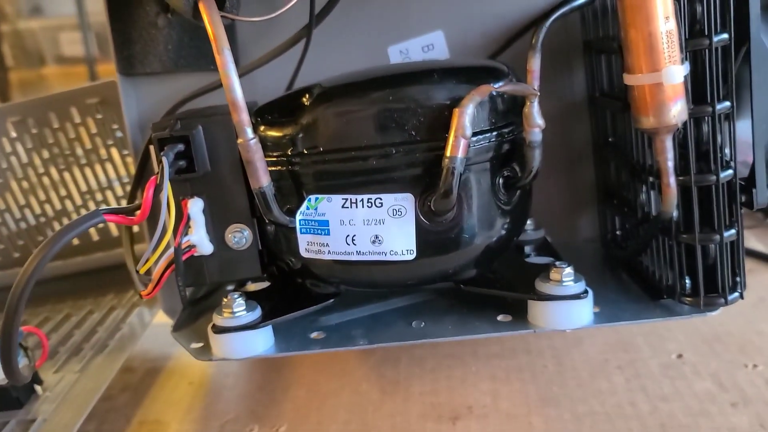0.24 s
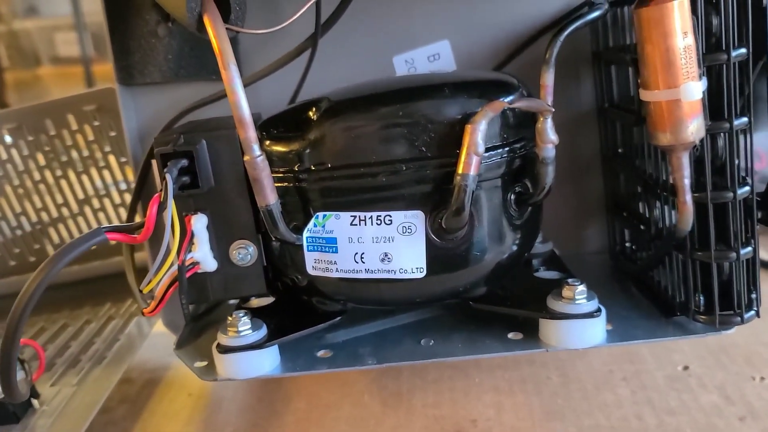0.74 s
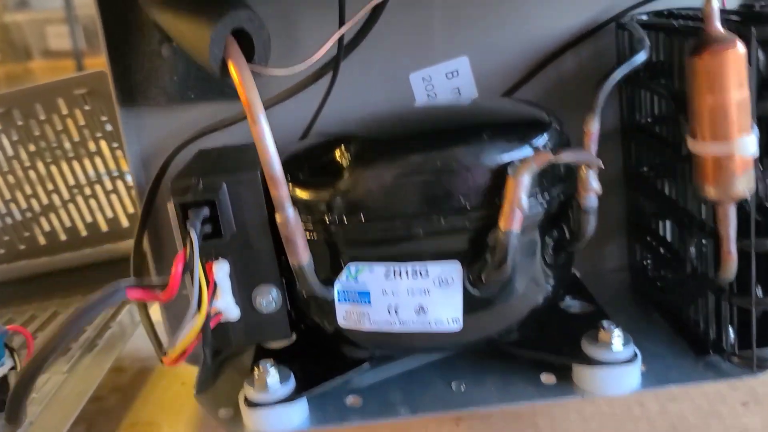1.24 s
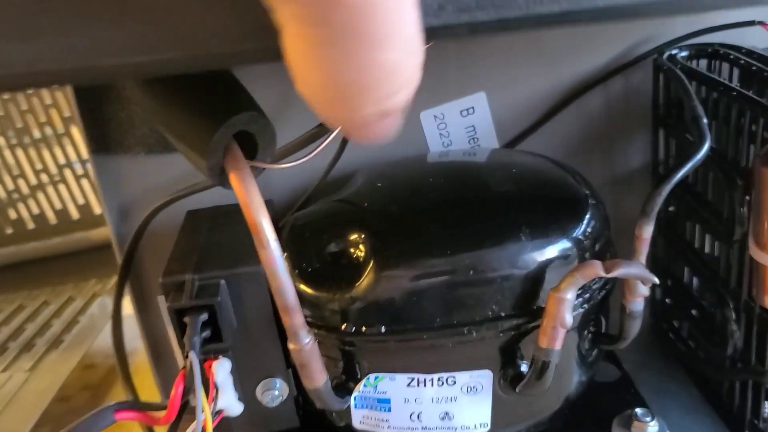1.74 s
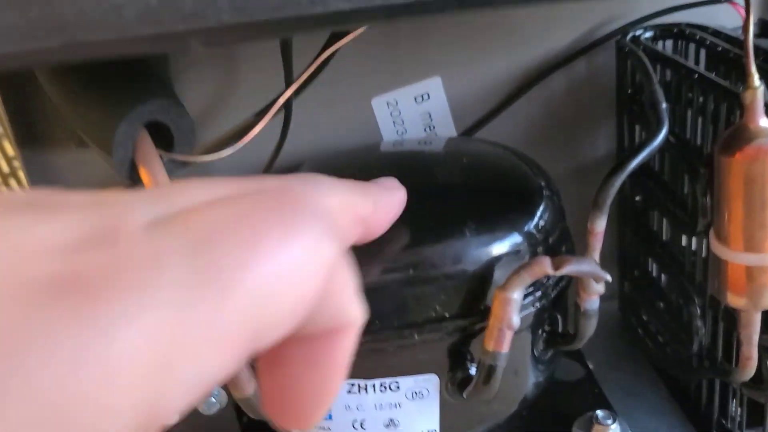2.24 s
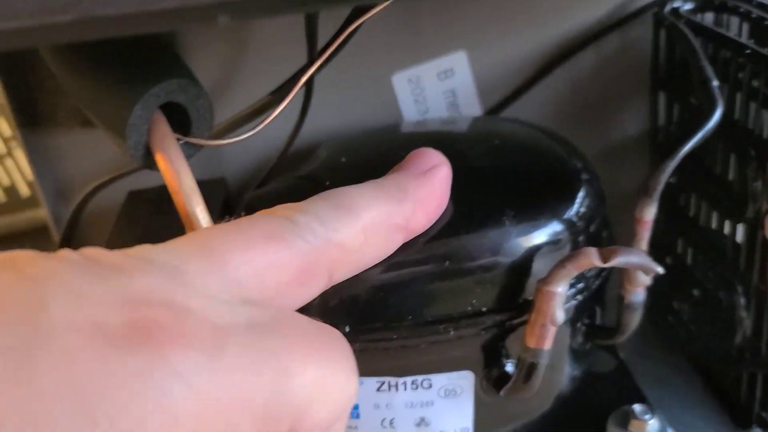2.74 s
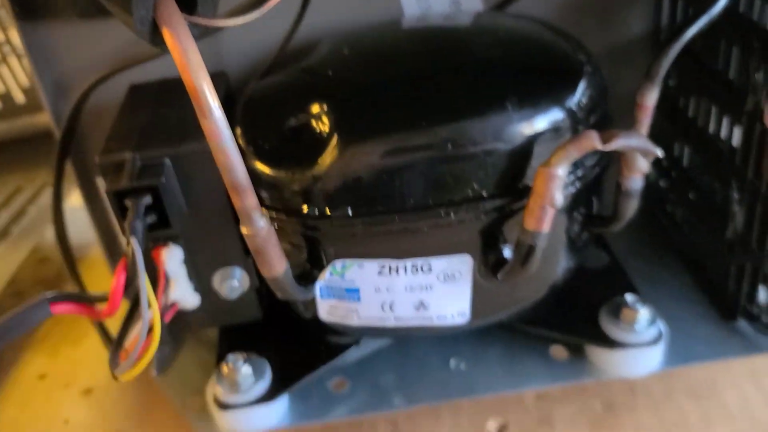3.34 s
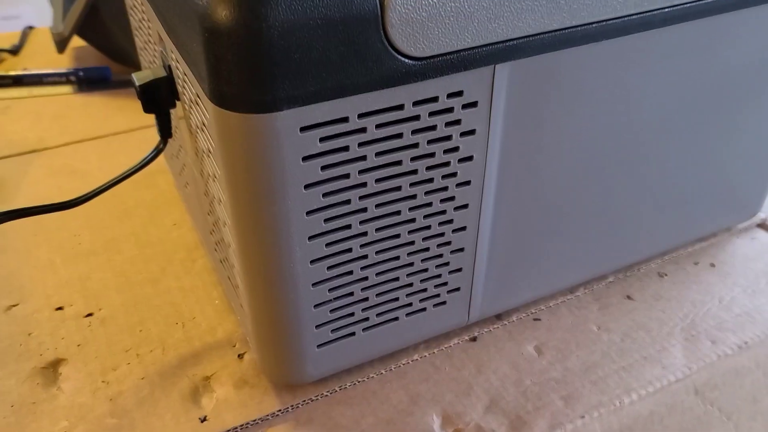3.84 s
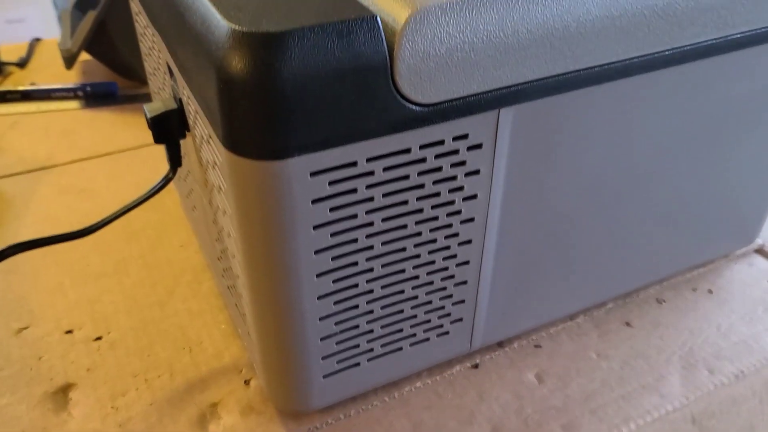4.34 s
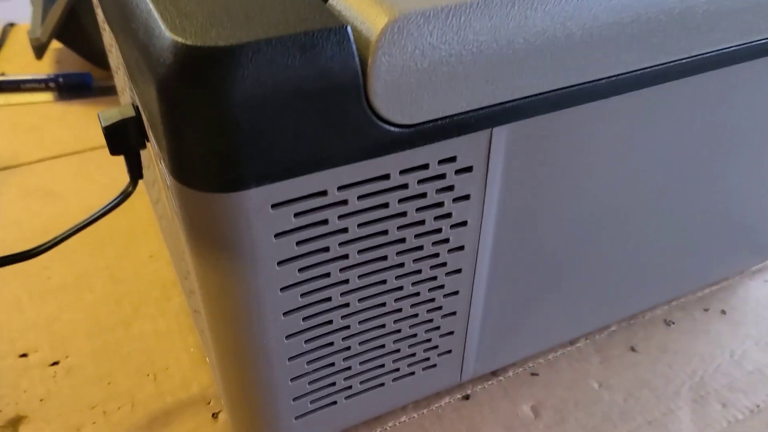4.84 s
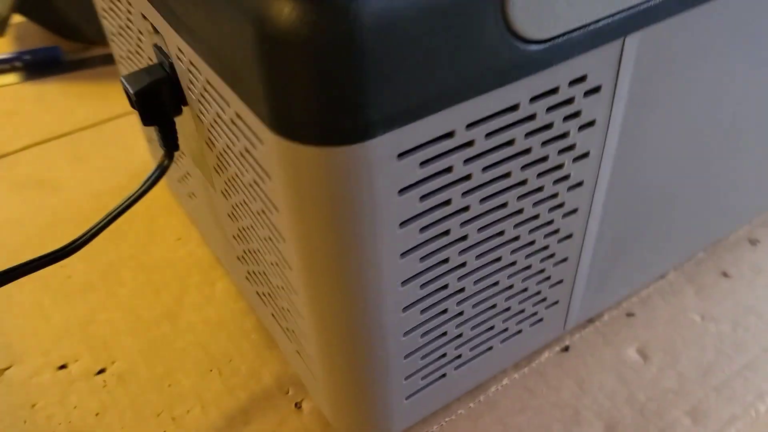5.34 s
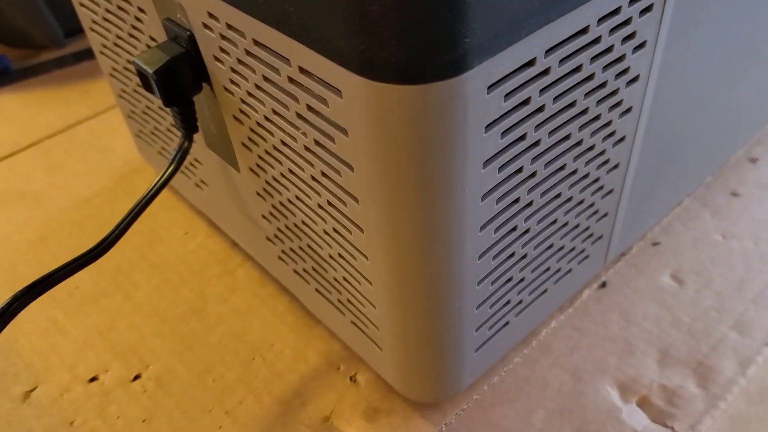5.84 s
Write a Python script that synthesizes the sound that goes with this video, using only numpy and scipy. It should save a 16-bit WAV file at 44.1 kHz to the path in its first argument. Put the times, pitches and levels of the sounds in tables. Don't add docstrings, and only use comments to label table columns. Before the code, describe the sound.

A small sealed fridge compressor hums and rattles loosely, is knocked and pressed steadier, then after a tiny silence hums on inside its closed cabinet.

```python
import sys
import numpy as np
from scipy import signal
from scipy.fft import rfft, irfft, next_fast_len
from scipy.io import wavfile

SR = 44100
rng = np.random.default_rng(int(sys.argv[2]) if len(sys.argv) > 2 else 0)


def makeup_ratio(level_db):
    decades = np.asarray(level_db, float) / 20
    return 10 ** decades


def materialize(psi):
    bounded = np.clip(np.atleast_2d(psi).T, -1, 1)
    quanta = np.round(bounded * 32767).astype(np.int16)
    wavfile.write(sys.argv[1], SR, quanta)


N = 268833

# time in seconds, speed in turns per second.
SPEED_TURNS_PER_S = [(0, 33.602), (.6, 33.542), (1.2, 33.499), (1.8, 33.396), (2.4, 33.498), (3, 33.457),
                     (3.72, 33.465), (3.79, 33.634), (4.4, 33.546), (5, 33.507), (5.6, 33.584),
                     (6.1, 33.583)]
SILENCE_S = (3.7165, 3.792, 6.096)
# time in seconds, state (0 loose, 1 rocking, 2 pressed, 3 closed cabinet).
HOLD = [
    (0, 0),
    (1.47, 0),
    (1.6, 1),
    (1.88, 1),
    (1.98, 2),
    (3.75, 2),
    (3.76, 3),
    (6.1, 3),
]
# order, level in dB loose, rocking, pressed, closed.
ORDER_DB = [(1, -46, -48, -67, -60.5), (2, -59, -44, -33.5, -41), (3, -54, -31, -39.5, -38.),
            (4, -72, -48, -55, -56), (5, -52, -40, -30, -35.5), (6, -58, -39, -50, -37),
            (7, -83.5, -41, -74, -46.5), (8, -82, -41, -43, -52.5), (9, -84, -53, -61.5, -64),
            (10, -98, -60, -55.5, -63.5), (11, -58.5, -48, -58.5, -60.5), (12, -57, -48.5, -86, -71.5),
            (13, -60, -58, -61.5, -52), (14, -91, -80, -68, -61), (15, -80, -78, -61.5, -75),
            (16, -85, -70, -66, -76), (17, -85, -77, -71.5, -71), (19, -69, -69, -71, -67.5),
            (21, -124, -62.5, -77.5, -71), (22, -130, -115, -100, -68), (23, -57.5, -56.5, -56, -61),
            (24, -63.5, -64, -60, -86), (25, -69.5, -76, -86, -118.5), (28, -103, -80.5, -69.5, -100)]
THRUST_TURNS = [
    (.69, -.163, -.17),
    (.576, .399, .27),
    (.384, -.19, .13),
    (.188, -.471, .14),
]
# frequency in Hz, signed share, t60 in seconds, lag in seconds.
PLATE_MODES = [(186.6, .87, .125, -.0014), (221., -1.04, .058, -.0014), (397., -.16, .137, 0),
               (128.3, .63, .09, .0112), (109.9, -.55, .2, .0236)]
# frequency in Hz, signed share, t60 in seconds, lag in seconds.
CABINET_MODES = [(248., 1.24, .011, .0024), (351., -.19, .137, .0006), (329., .13, .16, .0076),
                 (201., -1.08, .075, .010), (55.8, .25, .2, .0126), (97.6, .3, .1, .0206),
                 (600., .05, .04, .002)]
# place open in turns, place closed in turns, ring in dB, puff in dB,
# scatter in turns.
VALVES = [(.975, .15, 0, -20, .02), (.38, .66, -4, -8, .02), (.47, .81, -12, -4, .015),
          (.54, .28, -9, -14, .04)]
# frequency in Hz, density in dB per Hz.
AIR_OPEN_DB = [(30, -11.5), (70, -6), (170, -2.5), (270, -13.5), (400, -16), (580, -23), (800, -25),
               (1400, -34.5), (2300, -38.5), (3100, -29), (3900, -36), (4700, -35.5), (10300, -32.5),
               (15800, -36.5)]
# frequency in Hz, density in dB per Hz.
AIR_SHUT_DB = [(30, -13), (77, -8), (190, -9), (320, -15), (435, -14), (560, -24.5), (880, -34),
               (1060, -29.5), (2400, -35.5), (3100, -29.5), (4500, -36), (5500, -37.5), (7300, -34.5),
               (15800, -40)]
# frequency in Hz, likeness.
LIKENESS = [(30, 0.9), (150, .98), (300, 0.64), (600, 0.48), (1200, 0.033), (3000, 0.033), (8000, 0.036),
            (15000, .02)]
# frequency in Hz, left minus right in dB.
LEAN_DB = [(60, 0), (300, 0), (1000, 1.5), (4000, -8.5), (8000, 6), (13000, -0.5)]
# time in seconds, peak in
# dB, frequency in Hz, t60 in seconds.
TOUCHES = [
    (1.838, -17.5, 168, 0.053),
    (1.875, -24, 60., 0.076),
    (1.893, -29, 430, 0.03),
    (2.04, -30, 450, 0.021),
    (3.659, -27, 61, 0.19),
]
# frequency in Hz, gain in dB.
MIC_DB = [(20, 0.5), (5000, 1.5), (5400, 0), (6400, 0.5), (7400, 0.5), (7900, -9.5), (8800, -10.5),
          (10200, -3), (12000, -4), (12600, -8), (13600, -7.5), (14600, -6.5), (15750, -9), (15850, -61)]
SIDE_ORDERS = [0, -10, 10, -20, 20, -15, 5.6, 15, 30, -29]
# level in dB, in the same sequence.
WHINE_DB = [0, -10., -7., -17., -15., -19., -17., -20., -21., -21.]
# time in seconds, gain in dB.
NEAR_DB = [(0, -10.5), (.6, -9), (1.2, -10), (1.6, -4), (1.9, 0.5), (2.2, -0.3), (2.8, -0.4), (3.72, 0.8),
           (3.79, 0.4), (4.5, -1), (5.0, 0), (5.4, 1.3), (5.8, 3.5), (6.1, 4.5)]
# time in seconds, gain in dB.
FACING_DB = [(0, -13), (.5, -0.5), (.8, 3.5), (1.0, -0.5), (1.35, 0), (1.55, 6), (1.9, -1), (2.6, 4),
             (3.3, -.5), (3.72, 4.5), (3.79, -11), (4.7, -4), (5.4, -1.5), (5.62, 0.5), (5.68, -11),
             (6.1, -29)]
# order, delay of the change in seconds, of its end in seconds.
SETTLE_S = [(2, .13, 0.061), (3, 0.04, 0.39)]
# delay in seconds, delay drift in seconds per second,
# peak at first in dB, growth in dB per second.
BOUNCE_TOUCHES = [
    (.0003, 0.0061, -31, 3.5),
    (0.0571, 0.019, -32, 0),
    (0.0971, -0.0077, -46, 12),
]
RUSTLE_KINDS = {"brush": (1730, 12500, 0.44), "rub": (1300, 8800, 0.64), "tap": (1200, 10300, 0.062),
                "thud": (850, 3500, 0.37), "tick": (4700, 15000, 0.11), "swish": (5000, 17000, .3),
                "squeak": (1850, 2300, 0.25), "snap": (2800, 7200, 0.24), "hiss": (5300, 6100, 1)}
RUSTLES = {"brush": [(1.34, .055, -57), (1.72, .03, -61), (1.789, .03, -45), (5.735, .11, -41.5),
           (5.82, .2, -48), (6.05, .062, -47.5)], "rub": [(2.221, .011, -45), (3.1, .1, -53),
           (5.07, .074, -52)], "tap": [(2.101, .033, -38.5), (2.459, .015, -47), (5.439, .06, -52)],
           "thud": [(2.044, .011, -38), (5.01, .04, -45), (5.04, .14, -52)], "tick": [(1.17, .02, -62),
           (5.602, .0073, -36)], "swish": [(3.421, .025, -62), (4.72, .12, -54)],
           "snap": [(5.612, .0075, -40)], "hiss": [(6.07, .08, -54)], "squeak": [(2.0, .068, -55)]}
# frequency in Hz, width in Hz, dB over the treble air.
WHISTLES = [(1213, 20, -28), (2170, 21, -24.5), (2716, 20, -25.5), (4170, 14, -19.5), (4550, 25, -21.5),
            (4680, 41, -17), (4960, 23, -25), (5400, 16, -29), (6410, 45, -13)]

# dB open, dB closed, share of nearness, share of facing.
AIR_BASS, AIR_MIDDLE = (-53, -54.5, 0.89, 0.15), (-52, -54.5, 1.06, 0.11)
AIR_TREBLE, SHELL_HUM = (-53.5, -57.5, .55, -0.04), (-0.19, -0.51, 0.36, 0.043)
REED_RING, DRIVE_WHINE = (-49.5, -56.5, 2.1, 0.4), (-66, -74.5, -0.06, 0.4)

RESTART_S = 3.79
CARRIER_HZ = 10080.
REED_HZ, REED_WIDTH_HZ, REED_SPREAD_HZ = 3120, 410, 55
MUFFLER_HZ, MUFFLER_WIDTH_HZ, MUFFLER_OPEN_DB, MUFFLER_SHUT_DB = 4600., 800, -69, -63
REFLECTION_HZ, REFLECTION_WIDTH_HZ, REFLECTION_DB = 2800, 270, -10
PORT_LAG_S = .00017
KNOCK_S, KNOCK_DB = 1.789, -9.8
KNOCK_DIP_S, KNOCK_DIP_WIDTH_S, KNOCK_DIP_DB, THIRD_DIP_DB = 1.875, 0.028, -4.5, -9
LOOSE_DB_PER_S = 30
CORNER_S, CORNER_DB_PER_S, FAN_DB_PER_S = 4.86, 15.5, 6
BOUNCE_START_S, BOUNCE_EVERY_S, BOUNCE_END_S = .0135, .14893, 1.58

OPPOSITE = np.array([[1], [-1]])


def rms_one(x):
    return x / np.sqrt(np.mean(x ** 2) + 1e-20)


def in_time(rows):
    s, *columns = np.transpose(rows)
    return [np.interp(np.arange(N) / SR, s, c) for c in columns]


def at_hz(points, hz):
    table_hz, value = np.array(points).T
    return np.interp(np.log(hz), np.log(table_hz), value)


def drift(rate_hz):
    r = np.exp(-80 * np.pi * rate_hz / SR)
    noise = rng.standard_normal(N // 40 + 2002)
    slow = signal.lfilter([1], [1, -2 * r, r * r], noise)[2000:]
    return np.interp(np.arange(N) / 40, np.arange(len(slow)), rms_one(slow))


def band(x, low_hz, high_hz):
    edges_hz = [low_hz, min(high_hz, .45 * SR)]
    return signal.sosfilt(signal.butter(3, edges_hz, "band", fs=SR, output="sos"), x)


def clicks_at(seconds, sizes):
    out = np.zeros(N)
    i = np.clip((np.asarray(seconds) * SR).astype(int), 0, N - 1)
    np.add.at(out, i, sizes)
    return out


def ring(clicks, hz, t60_s):
    r = makeup_ratio(-60 / (t60_s * SR))
    w = 2 * np.pi * hz / SR
    return signal.lfilter([0, np.sin(w)], [1, -2 * r * np.cos(w), r * r], clicks + 1e-18)


def swell(clicks, hz, width_hz):
    for _ in range(4):
        clicks = ring(clicks, hz, 2.2 / width_hz)
    return rms_one(clicks)


def struck(s, peak_db, modes, scatter_db):
    luck_db = rng.normal(0, scatter_db, (len(s), len(modes)))
    out = np.zeros(N)
    for k, (hz, share, t60_s, lag_s) in enumerate(modes):
        blows = clicks_at(s + lag_s, share * makeup_ratio(peak_db + luck_db[:, k]))
        out -= ring(blows, hz, t60_s)
    return out


def stereo(x, lean_db, lag_s):
    late = np.interp(np.arange(N) - lag_s * SR, np.arange(N), x)
    return np.array([x * makeup_ratio(lean_db / 2), late * makeup_ratio(-lean_db / 2)])


def level(layer):
    open_db, shut_db, near_share, facing_share = layer
    base_db = np.where(in_time(HOLD)[0] > 2.5, shut_db, open_db)
    return base_db + facing_share * in_time(FACING_DB)[0] + near_share * in_time(NEAR_DB)[0]


def shaft_turns():
    turns = np.cumsum(in_time(SPEED_TURNS_PER_S)[0]) / SR
    restart = int(RESTART_S * SR)
    turns[restart:] -= turns[restart]
    return turns, restart


def air(puffs, restart):
    zone_db = [level(AIR_BASS), level(AIR_MIDDLE), level(AIR_TREBLE)]
    together = drift(5)
    edges_hz = 28 * 2 ** np.arange(0, 9.3, 1 / 4)
    white = rng.standard_normal((2, 2, N))
    shut = np.arange(N) > restart
    out = np.zeros((2, N))
    for k, (low_hz, high_hz) in enumerate(zip(edges_hz, edges_hz[1:])):
        mid, side = band(white[k % 2], low_hz, high_hz)
        hz = np.sqrt(low_hz * high_hz)
        alike = np.clip(at_hz(LIKENESS, hz), -1, 1)
        lean = makeup_ratio(at_hz(LEAN_DB, hz) / 2 * OPPOSITE)
        level_db = np.where(shut, at_hz(AIR_SHUT_DB, hz), at_hz(AIR_OPEN_DB, hz))
        level_db = level_db + 35 + zone_db[int(hz > 600) + int(hz > 2800)]
        flicker_db = .7 * together + .7 * drift(14)
        gain = makeup_ratio(level_db + flicker_db) * (1 + 1.28 * puffs * (400 < hz < 8000))
        out += gain * lean * (np.sqrt(1 + alike) * mid + np.sqrt(1 - alike) * side * OPPOSITE)
    return out


def rustles():
    out, t = np.zeros((2, N)), np.arange(N) / SR
    grain = rng.standard_normal((3, N)) * makeup_ratio(drift(170))
    for kind, (low_hz, high_hz, rise_share) in RUSTLE_KINDS.items():
        for s, fall_s, db in RUSTLES[kind]:
            rise_s = rise_share * fall_s
            i = slice(int((s - 4 * rise_s) * SR), int((s + 2 * fall_s) * SR))
            rising = np.exp((t[i] - s) / rise_s * 1.5)
            falling = np.exp((s - t[i]) / fall_s * 2.3)
            shape = np.where(t[i] < s, rising, falling)
            burst = band(grain[:2, i] + 0.93 * grain[2, i], low_hz, high_hz)
            out[:, i] += makeup_ratio(db) * shape * rms_one(burst)
    return out


def whine(restart):
    t = np.arange(N) / SR
    turns = np.cumsum(in_time(SPEED_TURNS_PER_S)[0]) / SR
    flutter_db = 1.9 + 1.4 * np.clip(in_time(HOLD)[0] - 1, 0, 1)
    side_gain = np.where(np.arange(N) > restart, makeup_ratio(2.0), 1)
    lines = np.zeros(N)
    for order, db in zip(SIDE_ORDERS, WHINE_DB):
        tone = np.sin(2 * np.pi * (CARRIER_HZ * t + order * turns + rng.random()))
        lines += makeup_ratio(db + flutter_db * drift(7.5)) * (side_gain if order else 1) * tone
    return np.sqrt(2) * makeup_ratio(level(DRIVE_WHINE) + 5.5) * lines


def whistles():
    noise, hold = rng.standard_normal(N), in_time(HOLD)[0]
    free = np.clip(2 - hold, 0, 1)
    sung = np.zeros(N)
    for hz, width_hz, db in WHISTLES:
        t60_s = 2.0 / width_hz
        sung += makeup_ratio(db) * rms_one(ring(ring(noise, hz, t60_s), hz, t60_s))
    return makeup_ratio(level(AIR_TREBLE)) * (0.47 + 0.51 * free) * (hold < 2.5) * sung


def valves(turns, restart):
    snaps, puffs = np.zeros(N), np.zeros(N)
    starts = np.flatnonzero(np.diff(np.floor(turns)) > 0)
    luck = rng.standard_normal((len(starts), len(VALVES), 3))
    for k, (place_open, place_shut, ring_db, puff_db, scatter) in enumerate(VALVES):
        place = np.where(starts < restart, place_open, place_shut) + scatter * luck[:, k, 0]
        s = starts / SR + place / 33.5
        snaps += clicks_at(s, makeup_ratio(ring_db + 4.34 * luck[:, k, 1]) * np.sign(luck[:, k, 2]))
        puffs += clicks_at(s, makeup_ratio(puff_db + 2.5 * luck[:, k, 2]))
    fade = np.exp(-1 / (.002 * SR))
    return snaps, signal.lfilter([1], [1, -fade], puffs)


def valve_rings(snaps, puffs, turns, restart, loose):
    reed_db = level(REED_RING) + 7.0 * loose * np.cos(2 * np.pi * (turns / 5 - .32))
    dealt = rng.integers(0, 3, N)
    rings = np.zeros(N)
    for k in range(3):
        rings += swell(snaps * (dealt == k), REED_HZ + REED_SPREAD_HZ * (k - 1), REED_WIDTH_HZ)
    rings *= makeup_ratio(reed_db - 5.5)
    seat_tap = rms_one(band(np.diff(puffs, prepend=0), 450.0, 2230.0))
    rings += makeup_ratio(level(AIR_MIDDLE) - 14) * (1 - loose) * seat_tap
    muffler_db = np.where(np.arange(N) < restart, MUFFLER_OPEN_DB, MUFFLER_SHUT_DB) - 8 * loose
    rings += makeup_ratio(muffler_db) * swell(puffs * rng.standard_normal(N), MUFFLER_HZ, MUFFLER_WIDTH_HZ)
    reflection = makeup_ratio(reed_db + REFLECTION_DB) * swell(snaps, REFLECTION_HZ, REFLECTION_WIDTH_HZ)
    return stereo(rings, -0.71, -0.000049) + reflection * OPPOSITE


def knock():
    out = struck(np.array([KNOCK_S]), KNOCK_DB, CABINET_MODES, scatter_db=0)
    for s, db, hz, t60_s in TOUCHES:
        push = clicks_at([s], makeup_ratio(db) * 19 / (t60_s * SR))
        out += ring(ring(push, hz, t60_s), hz, t60_s)
    return out


def bounce():
    start_s = np.arange(BOUNCE_START_S, BOUNCE_END_S, BOUNCE_EVERY_S)[:, None]
    delay_s, slip, peak_db, growth_db = np.transpose(BOUNCE_TOUCHES)
    s = (start_s + delay_s + slip * start_s).ravel()
    db = (peak_db + growth_db * start_s).ravel()
    loose = s < BOUNCE_END_S
    return band(struck(s[loose], db[loose], PLATE_MODES, scatter_db=1.5), 29.0, 1000.0)


def hum(turns):
    t, out = np.arange(0, N, 64) / SR, np.zeros(N)
    hold_s, hold = np.transpose(HOLD)
    settle_s = {round(order): np.array([0, 0, 0, *s, 0, 0, 0]) for order, *s in SETTLE_S}
    place, smear, phase = np.transpose(THRUST_TURNS)
    past_corner_s = np.maximum(t - CORNER_S, 0)
    dip = np.exp(-((t - KNOCK_DIP_S) / KNOCK_DIP_WIDTH_S) ** 2)
    common_db = level(SHELL_HUM)[::64] + KNOCK_DIP_DB * dip
    extra_db = {3: LOOSE_DB_PER_S * np.minimum(t - hold_s[1], 0) + THIRD_DIP_DB * dip,
                9: CORNER_DB_PER_S * past_corner_s, 23: FAN_DB_PER_S * past_corner_s}
    for order, *level_db in ORDER_DB:
        order = round(order)
        state = np.interp(t, hold_s + settle_s.get(order, 0), hold)
        angle = 2 * np.pi * (phase - place * order - smear * order ** 2)
        each_state = np.sqrt(2) * makeup_ratio(level_db) * np.exp(1j * angle)
        gain_db = common_db + extra_db.get(order, 0) + 0.26 * drift(2.3)[::64]
        swing = np.interp(state, range(4), each_state) * makeup_ratio(gain_db)
        swing = np.interp(np.arange(N) / 64, np.arange(len(swing)), swing)
        out += np.real(swing * np.exp(2j * np.pi * order * turns))
    return out


def scene():
    turns, restart = shaft_turns()
    snaps, puffs = valves(turns, restart)
    loose = np.clip(1 - in_time(HOLD)[0], 0, 1)
    out = air(puffs * (1 - .6 * loose), restart) + rustles()
    out += stereo(whine(restart), -8.5, .00002) + stereo(whistles(), -1.5, 0)
    out += valve_rings(snaps, puffs, turns, restart, loose)
    return out + stereo(hum(turns) + bounce() + knock(), 0.83, PORT_LAG_S)


def low_pass(x):
    return signal.sosfilt(signal.butter(12, 16160, fs=SR, output="sos"), x)


def record(dry):
    size = next_fast_len(N)
    hz = np.arange(size // 2 + 1) * SR / size + 1
    heard = irfft(rfft(dry, size) * makeup_ratio(at_hz(MIC_DB, hz)), size)[:, :N]
    t = np.arange(N) / SR
    stop_s, start_s, end_s = SILENCE_S
    before = np.clip((stop_s - t) / .0005, 0, 1)
    after = np.clip((t - start_s) / .001, 0, 1) * (t < end_s)
    return low_pass(heard * (before + after))


dry = scene()
out = record(dry)
materialize(out)
```